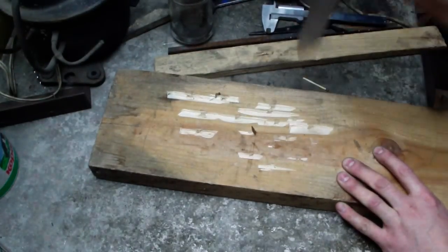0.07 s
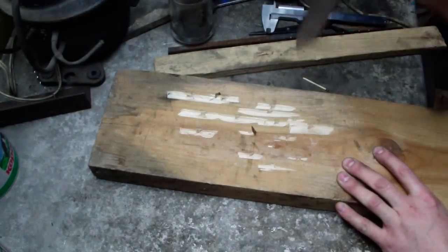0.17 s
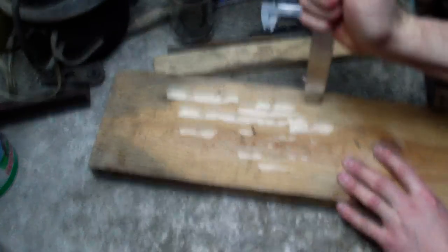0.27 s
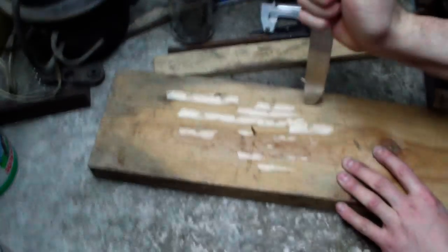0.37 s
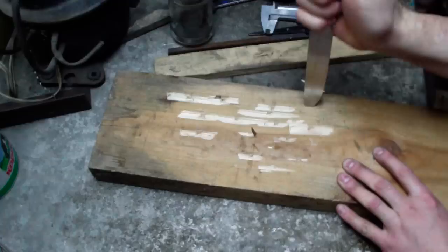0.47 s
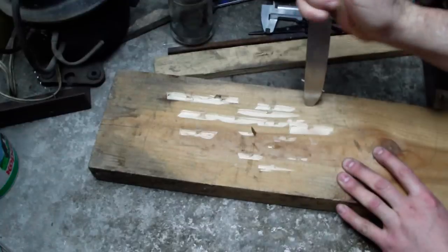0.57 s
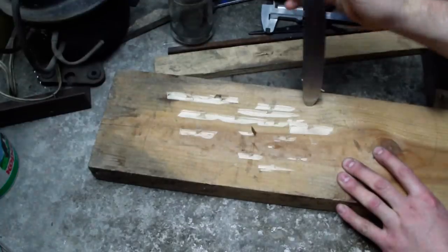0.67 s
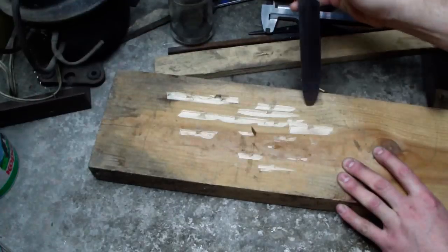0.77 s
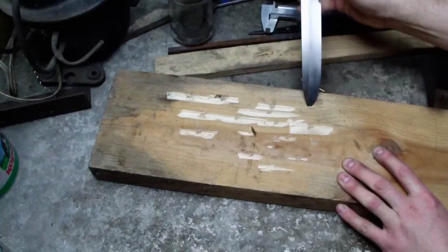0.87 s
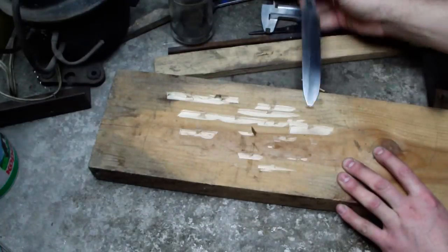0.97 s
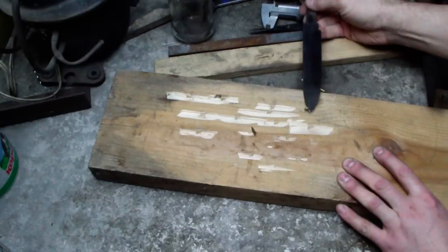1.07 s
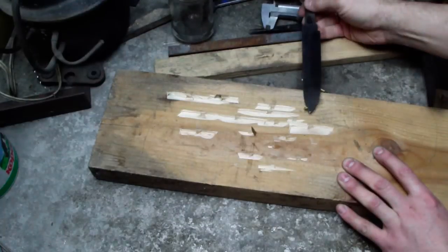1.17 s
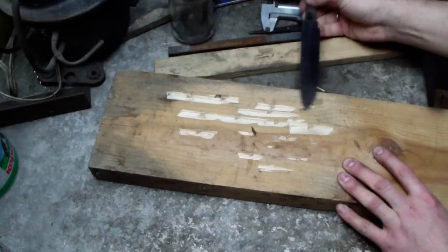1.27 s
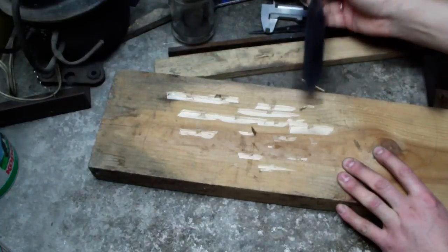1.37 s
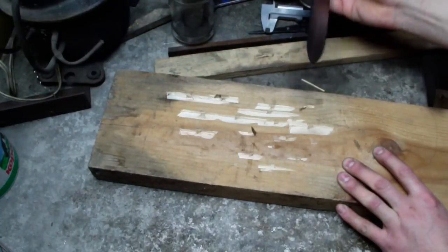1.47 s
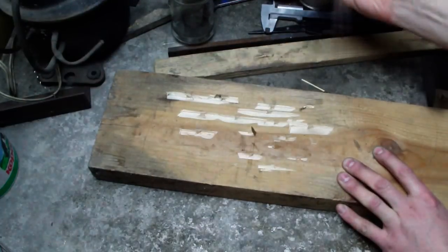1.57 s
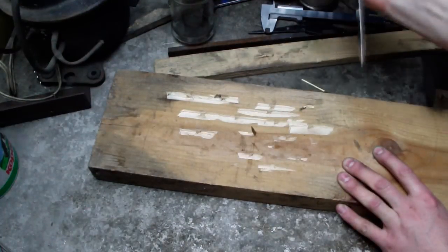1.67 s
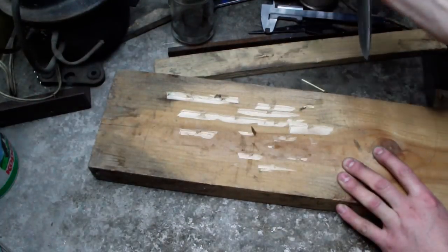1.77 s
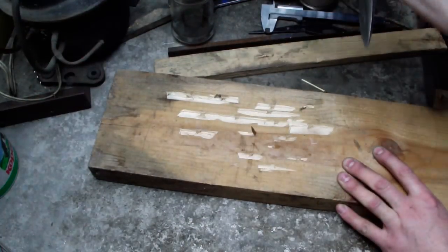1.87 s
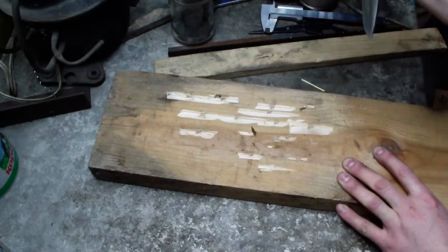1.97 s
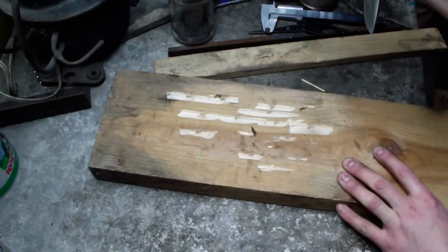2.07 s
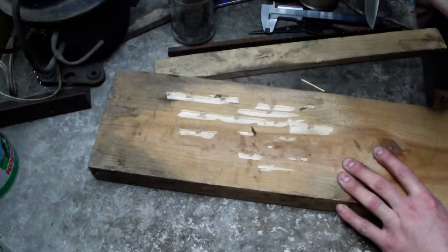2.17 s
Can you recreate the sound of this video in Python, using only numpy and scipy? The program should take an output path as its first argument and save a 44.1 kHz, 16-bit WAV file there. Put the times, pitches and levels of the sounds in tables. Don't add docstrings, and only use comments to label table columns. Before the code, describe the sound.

Knife point slams into a plank, overloading a close camera microphone; tools clatter briefly, the blade snaps and squeaks as it is pulled out, the plank knocks on the bench, then only hiss and electric whine.

```python
import sys
import numpy as np
from scipy import signal
from scipy.fft import rfft, irfft
from scipy.io import wavfile
from scipy.ndimage import uniform_filter1d

SR = 44100
rng = np.random.default_rng(int(sys.argv[2]) if len(sys.argv) > 2 else 0)


def unload_wav(signal):
    wavfile.write(
        sys.argv[1],
        SR,
        np.round(np.clip(np.atleast_2d(signal).T, -1, 1) * 32767).astype(np.int16),
    )


def convert_level_to_amplitude(level_db):
    exponent = np.asarray(level_db, float) / 20
    return 10 ** exponent


N = 97020
STAB_S = .2015
RISE_S = 0.00071

# time in seconds, pitch in Hz, level in dB.
SWING = [
    (.19, 75.5, -34),
    (.21, 78.2, -24),
    (.25, 78.9, -13.5),
    (.285, 83.2, -10),
    (.34, 98.2, -14.5),
    (.405, 88.6, -21),
    (.44, 97.4, -33),
    (.6, 86.7, -44),
]
# pitch in Hz, level in dB, time to fade by 60 dB in seconds.
BENCH = [(76.7, -5, 0.43), (148, -21, 0.11), (194, -9.5, 0.17)]
# frequency in Hz, level in dB.
FIZZ = [(4000, -53), (5000, -12.5), (6300, 4.5), (8000, 11), (9000, 6.5), (11000, -4), (15000, -50)]
# frequency in Hz, level in dB.
CONTACT = [(400, -10.5), (900, 0), (1800, -4.5), (2500, 2), (3200, 3), (3900, -6.5), (4600, -16.5),
           (6000, -27.5)]


def evened(x):
    return x / np.sqrt(np.mean(x ** 2) + 1e-20)


def along(table, column=1):
    rows = np.transpose(table)
    return np.interp(np.arange(N) / SR, rows[0], rows[column])


def colour(x, points):
    f, db = np.transpose(points)
    hz = np.fft.rfftfreq(8192, 1 / SR)
    cepstrum = irfft(np.log(convert_level_to_amplitude(np.interp(np.log(hz + 1), np.log(f + 1), db, -70, -70))))
    fold = np.r_[1, 2 * np.ones(4095), 1, np.zeros(4095)]
    taps = irfft(np.exp(rfft(cepstrum * fold)))[:4096]
    return signal.oaconvolve(x, taps / np.linalg.norm(taps))[:N]


def resonate(x, hz, width):
    r = np.exp(-np.pi * abs(width) / SR)
    return 2 * signal.lfilter([1 - r], [1, -r * np.exp(2j * np.pi * hz / SR)], x + 0j).real


def ring(x, modes):
    t = np.arange(SR // 2) / SR
    taps = sum(convert_level_to_amplitude(db - 60 * t / t60) * np.sin(2 * np.pi * hz * t) for hz, db, t60 in modes)
    return signal.oaconvolve(x, taps / np.linalg.norm(taps))[:N]


def grains(spread_db=5):
    per_second = 4000
    hit, size, noise = rng.random(N), rng.exponential(1, N), rng.standard_normal((2, N))
    impacts = (hit < per_second / SR) * convert_level_to_amplitude(spread_db * np.minimum(size, 4)) * np.sign(noise[0])
    return evened(impacts + 0.58 * noise[1])


def blow(s, db, t60, rise=RISE_S):
    crack_db, crack_t60 = 1.5, 0.0062
    t = np.maximum(np.arange(N) / SR - s, 0)
    return np.minimum(t / rise, 1) * convert_level_to_amplitude(db) * (convert_level_to_amplitude(-60 * t / t60) + convert_level_to_amplitude(crack_db - 60 * t / crack_t60))


def wobble(curve, hz, width):
    x = resonate(resonate(rng.standard_normal(N), hz, width), hz, width)
    return convert_level_to_amplitude(along(curve)) * x / np.sqrt(uniform_filter1d(x ** 2, size=3000) + 1e-12)


def plank(x):
    # pitch in Hz, level in dB, time to fade by 60 dB in seconds.
    modes = [(400, -5, .05), (620, -5, .055), (940, -3, .045), (1150, -5, .04), (1435, -8, .045),
             (1590, -6, .035), (260, -5, .05)]
    # frequency in Hz, level in dB.
    body = [(120, -13), (250, 7), (900, 6.5), (1600, 11.5), (2600, -22)]
    longest_ring_s, body_db = .085, 4
    damped = [(hz, db, min(t60, longest_ring_s)) for hz, db, t60 in modes]
    return ring(x, damped) + convert_level_to_amplitude(body_db) * colour(x, body)


def background():
    # frequency in Hz, level in dB per Hz.
    hiss = [(18, -40), (30, 0.5), (1070, -9), (1820, -3.5), (2070, -7.5), (2880, -2), (5590, -14),
            (7400, -12), (13300, -21.5)]
    # middle in Hz, width in Hz, level in dB.
    whirr = [(1282, 37, -52), (1792, 73, -40.5), (2845, 230, -43), (3830, 240, -50.5), (15000, 2200, -47)]
    whine_hz = (7440.4, 14880.8, 15119.5)
    whine_db = (-42, -46.5, -57)
    hiss_db, flutter_db = -38.5, -1.5
    notch_hz, notch_width, notch_db = 13820, 750, -26
    t = np.arange(N) / SR
    out = convert_level_to_amplitude(hiss_db) * evened(colour(rng.standard_normal(N), hiss + [(15300, hiss[-1][1])]))
    for hz, width, db in whirr:
        band = resonate(resonate(rng.standard_normal(N), hz, 2.0 * width), hz, 2.0 * width)
        slow = uniform_filter1d(rng.standard_normal(N), size=1500)
        flutter = evened(uniform_filter1d(slow, size=1500))
        out += convert_level_to_amplitude(db + flutter_db * flutter) * evened(band)
    out += (convert_level_to_amplitude(notch_db) - 1) * resonate(out, notch_hz, notch_width)
    for hz, db in zip(whine_hz, whine_db):
        out += np.sqrt(2) * convert_level_to_amplitude(db) * np.sin(2 * np.pi * hz * t)
    return out


def camera_shake():
    # time in seconds, level in dB.
    shake_curve = [
        (0, -30.5),
        (.19, -37),
        (.3, -14.5),
        (.35, -11),
        (.41, -12.5),
        (.5, -29),
        (.83, -37),
        (1.5, -43),
        (1.65, -39.5),
        (2.2, -46.5),
    ]
    return wobble(shake_curve, hz=26.2, width=51)


def bench_tremble():
    # time in seconds, level in dB.
    hands = [
        [(0, -41.5), (.1, -41), (.19, -28)],
        [(.56, -31.5), (.8, -56.5), (.95, -39), (1., -26), (1.2, -44.5), (1.28, -18.5), (1.38, -45),
         (1.45, -31.5), (1.7, -45.5)],
    ]
    before, after = hands
    quiet = [(SWING[1][0], -60), (SWING[-3][0], -60)]
    return wobble(list(before) + quiet + list(after), hz=77, width=39.5)


def dry_ticks():
    # start in seconds, peak in dB, pitch in Hz.
    events = [(.020, -24, 3360), (.190, -14, 3400), (.446, -22, 3400), (.477, -25, 3400), (.605, -25, 3600),
              (.705, -23, 3400), (.924, -20, 3600), (1.548, -29, 8400), (1.996, -21, 3000),
              (2.095, -17, 3330), (2.187, -20, 3300)]
    t60, width = .03, 600
    noise, out = 1 + rng.standard_normal(N) * 2, 0
    for s, db, hz in events:
        tick = resonate(resonate(blow(s, 0, t60) * noise, hz, width), hz, 2 * width)
        out = out + convert_level_to_amplitude(db) * tick / abs(tick).max()
    return out


def rattle():
    # time in seconds, level in dB.
    shaking = [
        (.201, -5),
        (.217, -11.5),
        (.25, -11.5),
        (.29, -12),
        (.315, -12.5),
        (.345, -14),
        (.368, -18.5),
        (.41, -30),
        (.56, -42.5),
    ]
    # frequency in Hz, level in dB.
    clatter = [(100, -4.5), (200, -8), (800, -13), (2000, -12.5), (3100, -12.5), (3800, -16), (4700, -35),
               (6500, -57)]
    # pitch in Hz, level in dB, time to fade by 60 dB in seconds.
    wood = [(419.4, 3, 0.21), (940, -3, 0.044)]
    fizz_db, plank_db, thud_db, wood_db = -12.5, -44, -9.5, -18
    t = np.arange(N) / SR
    start = np.clip((t - STAB_S) / 0.0013, 0, 1)
    end = np.clip((shaking[-1][0] + 0.103 - t) / 0.015, 0, 1)
    level = convert_level_to_amplitude(along(shaking)) * start * end
    clumps = evened(uniform_filter1d(rng.standard_normal(N), size=250))
    drive = evened(grains(spread_db=4.5) * convert_level_to_amplitude(1.5 * clumps))
    loose = level * (evened(colour(drive, clatter)) + convert_level_to_amplitude(fizz_db) * evened(colour(drive, FIZZ)))
    shaken = level * drive
    body = convert_level_to_amplitude(plank_db) * plank(shaken) + convert_level_to_amplitude(thud_db) * ring(shaken, BENCH[1:])
    return loose + body + convert_level_to_amplitude(wood_db) * ring(shaken, wood)


def push():
    u = np.maximum(np.arange(N) / SR - STAB_S, 0) / 0.0025
    return convert_level_to_amplitude(-1) * u * (2 - u) * np.exp(.5 - u)


def bench_swing():
    t = np.arange(N) / SR
    start = np.clip((t - SWING[0][0]) / 0.032, 0, 1)
    end = np.clip((SWING[-1][0] + 0.056 - t) / .04, 0, 1)
    tone = np.sin(2 * np.pi * np.cumsum(along(SWING)) / SR + 2.9)
    return np.sqrt(2) * start * end * convert_level_to_amplitude(along(SWING, column=2)) * tone


def jolts():
    # start in seconds, peak in dB, pitch in Hz, time to fade by 60 dB in seconds.
    events = [(0.205, -6.5, 1210, 0.023), (0.2045, -2, 3060, 0.012), (0.216, 1.5, 2910, 0.061),
              (0.218, -4, 2540, 0.036), (0.227, 0, 3310, 0.052), (0.238, -3, 2840, 0.034),
              (0.247, -3, 2950, .03), (.2517, -5, 3100, 0.023), (.258, -15, 2750, .03),
              (0.2728, -6.5, 3070, 0.064), (0.28, -14, 2680, 0.027), (0.292, -18, 3020, 0.043),
              (0.306, -4, 3240, 0.093), (0.3125, -6, 1790, 0.036), (.317, -15, 2310, 0.017),
              (0.3267, -9, 3150, 0.037), (0.333, -8, 3000, 0.023), (0.338, -4.5, 3040, 0.019),
              (0.3698, -5.5, 2640, 0.013), (0.3767, -5, 1900, 0.029), (0.3753, 1.5, 2960, 0.01),
              (0.3777, -16, 4000, 0.0088), (.382, -5.5, 1820, 0.018), (0.3854, -12, 2900, 0.021),
              (0.3877, -25, 1750, 0.018), (.409, -28, 2200, 0.035), (.434, -34, 2000, .04)]
    sharpness, wide_db, rise_s = 6.5, -4.5, 0.001
    noise, out, wide = rng.standard_normal(N), np.zeros(N), np.zeros(N)
    t = np.arange(SR // 10) / SR
    for s, db, hz, t60 in events:
        first = round(s * SR)
        at = slice(first, first + len(t))
        burst = np.minimum(t / rise_s, 1) * convert_level_to_amplitude(-60 * t / t60) * noise[at]
        tone = resonate(resonate(burst, hz, hz / sharpness), hz, 2 * hz / sharpness)
        out[at] += convert_level_to_amplitude(db) * tone / abs(tone).max()
        wide[at] += convert_level_to_amplitude(db + wide_db) * burst / abs(burst).max()
    return out + colour(wide, CONTACT) + convert_level_to_amplitude(-17) * colour(wide, FIZZ)


def ticks():
    # start in seconds, peak in dB, pitch in Hz, time to fade by 60 dB in seconds, fizz in dB.
    events = [(0.503, -26, 3040, 0.25, -0.5), (0.61, -16, 2840, 0.054, -11),
              (0.672, -14.5, 2920, 0.16, -8.5), (.736, -16, 2630, 0.086, -1),
              (0.76, -11, 2640, 0.091, -0.5), (0.782, -6.5, 2920, 0.11, -7.5), (.858, -9, 2500, 0.092, 0.5),
              (0.885, -11, 2430, 0.068, -13), (0.897, -34, 2480, 0.035, -6), (.91, -14, 3300, 0.055, -13),
              (0.965, -9, 1300, 0.046, -7.5), (0.972, -8, 2600, 0.084, -27)]
    # pitch in Hz, level in dB, time to fade by 60 dB in seconds.
    tip = [(6750, -6, .025), (8030, 0, .03), (8500, -7, .02), (9300, -3, .02), (10300, -1, .018),
           (11500, 3, .018)]
    tick_db, tone_db, tip_db, dry_db = -13.5, -0.5, -2.5, -16
    width, dry_above_hz, snap_within_s = 400, 3150, .2
    drive, hard, tone, fizz = grains(spread_db=-0.5), 0, 0, 0
    for s, db, hz, t60, fizz_db in events:
        hit = blow(s, db + tick_db, t60, rise=0.0012) * drive
        pitched = resonate(resonate(hit, hz, width), hz, 3 * width)
        is_dry = hz > dry_above_hz or s < STAB_S + snap_within_s
        hard = hard + convert_level_to_amplitude(dry_db * is_dry) * hit
        tone = tone + pitched * np.sqrt(SR / width / 4)
        fizz = fizz + convert_level_to_amplitude(fizz_db) * hit
    bright = colour(fizz, FIZZ)
    return colour(hard, CONTACT) + convert_level_to_amplitude(tone_db) * tone + convert_level_to_amplitude(-7.5) * bright + convert_level_to_amplitude(tip_db) * ring(bright, tip)


def clear_rings():
    # start in seconds, pitch in Hz, level in dB, time to fade by 60 dB in seconds.
    events = [
        (.8845, 1280, -20, .09),
        (.886, 538, -26, .11),
        (.8835, 2430, -21, .05),
        (.872, 1290, -29, .1),
        (.975, 1710, -15, .08),
        (1.028, 615, -12, .13),
        (1.105, 935, -19, .2),
        (1.383, 620, -18, .16),
        (1.383, 920, -17, .12),
    ]
    rise_s = .003
    out, t = np.zeros(N), np.arange(SR // 4) / SR
    for s, hz, db, t60 in events:
        tone = np.minimum(t / rise_s, 1) * convert_level_to_amplitude(db - 60 * t / t60) * np.sin(2 * np.pi * hz * t)
        out[round(s * SR):][:len(t)] += tone
    return out


def squeaks():
    # start in seconds, length in seconds, first pitch in Hz, last pitch in Hz, level in dB.
    slides = [
        (.915, .065, 9300, 8450, -42),
        (.9, .07, 8300, 7800, -46),
        (.945, .075, 9900, 8600, -45),
    ]
    rough_hz = 900 * uniform_filter1d(2 * rng.standard_normal(N), size=100)
    out = 0
    for s, length, from_hz, to_hz, db in slides:
        u = np.clip((np.arange(N) / SR - s) / length, 0, 1)
        hz = from_hz + (to_hz - from_hz) * u + rough_hz
        out = out + convert_level_to_amplitude(db) * np.sin(np.pi * u) * np.sin(2 * np.pi * np.cumsum(hz) / SR)
    return out


def knocks():
    # start in seconds, peak in dB, time to fade by 60 dB in seconds, wood ring in dB, fizz in dB.
    events = [(0.973, -6.5, 0.12, -1, -5.5), (1.006, -8.5, 0.048, -14, -15), (1.0242, 5, 0.1, -4, -22.5),
              (1.032, -5.5, 0.18, -26, -17), (1.066, -0.5, 0.064, -41, -6), (1.099, -3, 0.18, -47, -16.5),
              (1.106, 2.5, 0.046, -17, -13), (1.204, -21, .25, -11.5, -15), (1.228, -23.5, .2, -31, 0.5),
              (1.2429, -1, 0.14, 2.5, -25), (1.25, -4.5, 0.12, -8, -14), (1.267, -25, 0.36, -6, 2.5),
              (1.277, -19, 0.22, 6.5, -8), (1.311, -12, 0.079, -8, -11), (1.3164, 5.5, 0.064, -10.5, -17),
              (1.327, -7.5, 0.082, -5, -34), (1.341, -29, 0.068, 13, -32), (1.383, -12.5, 0.095, 6.5, -15),
              (1.416, -12, 0.12, -18, -16), (1.428, -30, 0.076, 6, -18), (1.439, -20.5, 0.13, -19, -6),
              (1.452, -27.5, 0.042, 5.5, -20), (1.488, -23, 0.091, 0, -2), (1.502, -35, 0.076, -4.5, -23),
              (1.521, -36, 0.16, -2, -18), (1.548, -36, 0.11, -6, 3), (1.571, -38, 0.066, 0, -20),
              (1.628, -42, 0.27, 3.5, -10), (1.65, -49, 0.13, -1, -20)]
    # pitch in Hz, level in dB, time to fade by 60 dB in seconds.
    blade = [(3085, 8, 0.4), (3108, 8.6, 0.61), (3380, 2, 0.25)]
    free_s, settle_s = 1.2, 1.4
    knock_db, thud_db, blade_db, lever_thud_db, free_blade_db = -13, -4, -14, -10, 1
    settle_rise_s, settle_hz = 0.0055, 1020
    drive, hard, wood, fizz, thud, steel = grains(), 0, 0, 0, 0, 0
    dull = evened(resonate(drive, 0, 2 * settle_hz))
    for s, db, t60, wood_db, fizz_db in events:
        soft = s > settle_s
        shape = blow(s, db + knock_db, t60, settle_rise_s if soft else RISE_S)
        hit = shape * drive
        body = convert_level_to_amplitude(wood_db) * shape * (dull if soft else drive)
        hard = hard + hit
        wood = wood + body
        fizz = fizz + convert_level_to_amplitude(fizz_db) * hit
        thud = thud + convert_level_to_amplitude(lever_thud_db * (s < free_s)) * body
        steel = steel + convert_level_to_amplitude(free_blade_db * (s > free_s)) * hit
    low = plank(wood) + convert_level_to_amplitude(thud_db) * ring(thud, BENCH)
    return colour(hard, CONTACT) + convert_level_to_amplitude(blade_db) * ring(steel, blade) + colour(fizz, FIZZ) + low


def room(x):
    tail_db, t60, top_hz = -9.5, 0.27, 1100
    noise = rng.standard_normal(SR // 2)
    t = np.arange(len(noise)) / SR
    dull = signal.lfilter(*signal.butter(2, [150, top_hz], "band", fs=SR), noise)
    tail = dull * convert_level_to_amplitude(-60 * t / t60) * (t > .008)
    return convert_level_to_amplitude(tail_db) * signal.oaconvolve(x, tail / np.linalg.norm(tail) / 4)[:N]


def scene():
    hits = rattle() + push() + bench_swing() + jolts() + ticks() + clear_rings() + knocks()
    rest = background() + camera_shake() + bench_tremble() + dry_ticks() + squeaks()
    return np.tile(hits + rest + room(hits), (2, 1))


def top_cut(x):
    return signal.sosfilt(signal.butter(12, 15680, fs=SR, output="sos"), x)


def record(dry):
    mono_hz, hiss_db, edge_hz = 150, -55, 15110
    clipped = np.clip(dry, -1, 1)
    stereo = np.array([np.roll(clipped[0], 1), clipped[1]])
    side = (stereo[0] - stereo[1]) / 2
    stereo = stereo - np.outer([1, -1], resonate(side, 0, 2 * mono_hz) / 2)
    stereo = stereo + convert_level_to_amplitude(hiss_db) * np.diff(rng.standard_normal((2, N + 1)))
    lowpass = signal.firwin(1023, edge_hz, window=("kaiser", 9), fs=SR)
    return top_cut(signal.oaconvolve(stereo, lowpass[None], "same"))


dry = scene()
out = record(dry)
unload_wav(out)
```